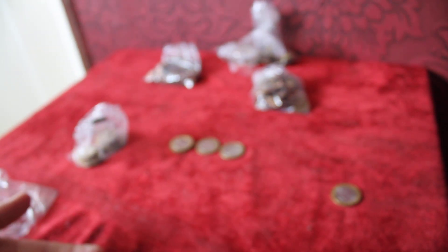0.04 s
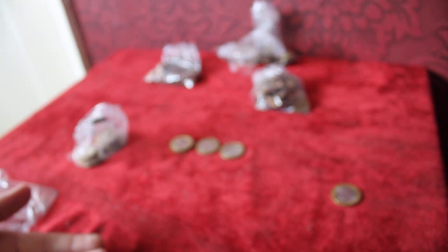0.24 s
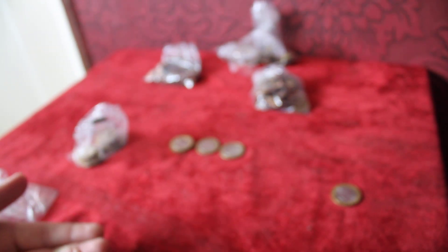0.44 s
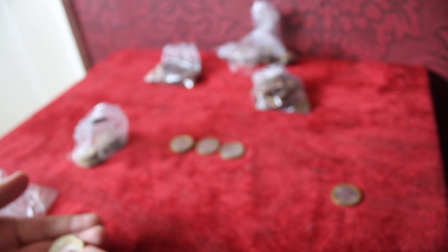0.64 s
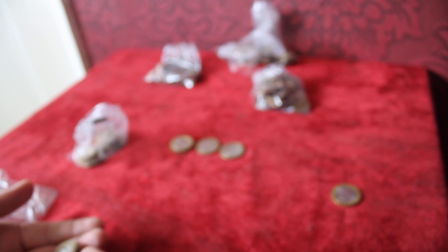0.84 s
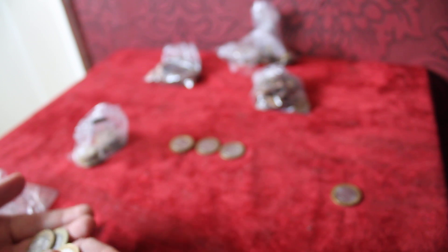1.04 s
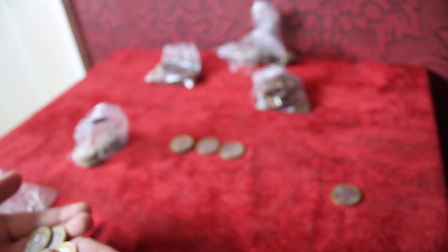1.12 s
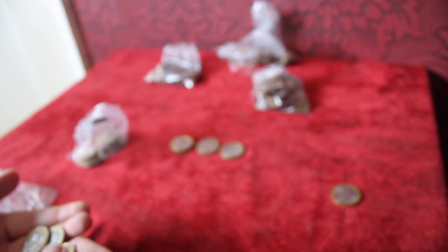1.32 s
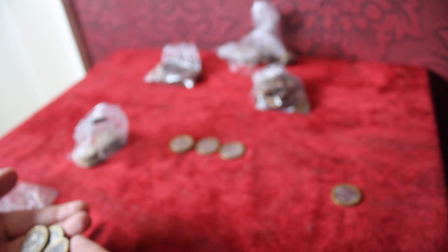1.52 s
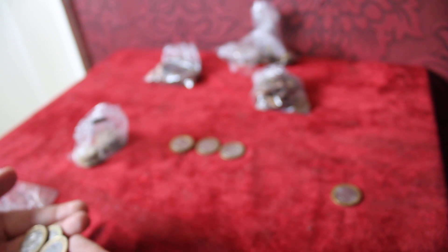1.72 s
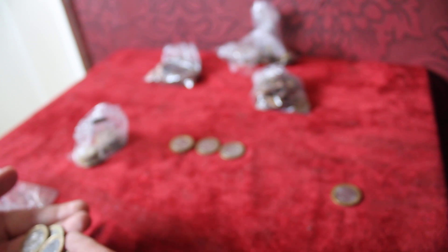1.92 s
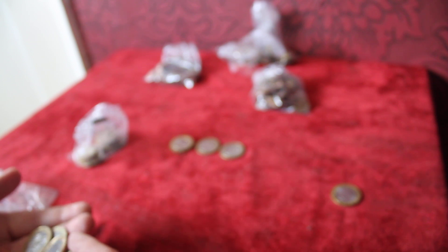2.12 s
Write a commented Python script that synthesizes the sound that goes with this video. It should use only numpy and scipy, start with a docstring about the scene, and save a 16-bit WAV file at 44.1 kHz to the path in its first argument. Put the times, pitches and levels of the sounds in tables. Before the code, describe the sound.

Coins clink into a palm, close up in a quiet room. A thin plastic bag crinkles and swishes from the start, and the first coins click and rasp together around 0.3 to 0.45 seconds. More crinkles and light clinks follow. The loudest clink lands at 0.9 seconds with a brief, high, shivering ring. Faint ticks and crinkles trail off by 1.6 seconds, leaving soft hiss and rustle.

```python
"""In a quiet room, close to the microphone, coins are tipped from a small plastic bag into a palm.
The coins click together and ring, and their ridged edges rasp past one another. One lands hard,
and they shiver briefly before the hand damps them; a few last ticks follow. The bag crinkles as
its creases snap, and swishes as it slips between the fingers. Faint hiss and rustle lie behind."""
import sys
import numpy as np
from scipy import signal
from scipy.fft import rfft, irfft, next_fast_len
from scipy.io import wavfile
from scipy.ndimage import map_coordinates

SR = 44100
rng = np.random.default_rng(int(sys.argv[2]) if len(sys.argv) > 2 else 0)


def transcribe(signal):
    """Save signal, clipped to [-1, 1], as a 16-bit WAV file at the path in sys.argv[1]."""
    frames = np.atleast_2d(signal).T
    limited = np.clip(frames, -1, 1)
    pcm = np.round(limited * 32767).astype(np.int16)
    wavfile.write(sys.argv[1], SR, pcm)


N = 94815

# Coin striking coin: start_s, click_db, ring_db, pitch_hz, fade_s (a fade is the time to drop 60 dB)
COIN_HITS = [(0.3264, -7.5, -28, 10100, 0.013), (0.3315, -11, -41, 10100, .02),
             (0.3403, -9.5, -38, 10100, .03), (0.3456, -4, -17.5, 10080, 0.018),
             (0.3757, -12.5, -32.5, 10430, 0.025), (.384, -5.5, -27, 10300, .03),
             (0.3874, -12.5, -16.5, 10070, 0.061), (.3914, -9.5, -25, 10340, .04),
             (.3977, -12, -20, 10380, .045), (.402, -10, -18, 10050, .045),
             (.4119, -17.5, -26.5, 10200, .05), (.4239, -15, -26.5, 10400, .05),
             (.431, -16, -23.5, 10450, 0.042), (0.563, -11.5, -29.5, 10400, 0.03),
             (.612, -24.5, -28.5, 10250, 0.06), (.6985, -28, -28.5, 10450, 0.11),
             (0.7711, -16.5, -21.5, 10310, 0.055), (.7875, -24, -24.5, 10340, 0.13),
             (.894, -6, -18, 10400, 0.035), (.8998, -8.5, -26, 10400, 0.033), (0.9045, -6, -26, 10250, .04),
             (.908, -9, -14, 8000, 0.024), (0.9088, 5, -8, 9000, 0.011), (0.9108, -6, -2, 10520, 0.01),
             (0.9181, -30, -22.5, 10270, 0.082), (0.9337, -24, -14.5, 10310, .06),
             (0.954, -30, -21.5, 10270, .08), (.9765, -23, -25, 10270, 0.074),
             (0.981, -20, -19, 10265, 0.092), (1.054, -23, -26.5, 10530, 0.04),
             (1.1796, -23, -36, 10400, 0.081), (1.1905, -21, -40, 10260, 0.12),
             (1.2386, -28.5, -36.5, 10570, 0.065), (1.3419, -22.5, -20, 10080, 0.029),
             (1.4181, -35, -35.5, 6900, 0.012)]
# The tones a coin rings with: pitch_ratio, level_db, fade_ratio
COIN_TONES = [(0.576, -23.5, .6), (.667, -19.5, .6), (.738, -20, 0.93), (.775, -19.5, .5), (1, 0.5, 1.18),
              (1.016, -11.5, .6), (1.05, -15.5, .3), (1.235, -22, .4)]
# Tone colour of a coin's click: frequency_hz, level_db
CLICK_COLOUR = [(300, -54.5), (1500, -26), (3500, -17), (5200, -6.5), (6800, -2.5), (8200, -5),
                (9600, -7.5), (11000, -7.5), (13000, -4.5), (16000, -9.5)]
# How hard the coins' edges slide on each other: time_s, level_db
SLIDE_LEVEL = [(.31, -96), (.335, -41), (.375, -29), (.402, -20), (.42, -29.5), (.431, -21), (.445, -55.5),
               (.51, -65.5), (.56, -31), (.585, -52), (.86, -53.5), (.884, -31), (.926, -43.5),
               (.965, -53.5), (.995, -35), (1.02, -43), (1.057, -33.5), (1.075, -51), (1.095, -45.5),
               (1.12, -67)]
# Tone colour of a ridged edge's tick: frequency_hz, level_db
RASP_COLOUR = [(300, -51), (900, -41.5), (1800, -19.5), (2900, -14.5), (3600, -23.5), (4200, -12.5),
               (5200, -6.5), (6000, 0), (6850, 4.5), (7400, -3), (8050, 0.5), (9500, -7), (11700, -4),
               (13500, -12), (16000, -16.5)]
# Creases snapping in the bag: start_s, level_db, fade_s, tilt_db_per_octave, peak_hz
BAG_SNAPS = [(.0055, -29.5, 0.013, -4, 7800), (0.0132, -16.5, 0.011, 0, 7800), (0.034, -36, .012, 0, 7800),
             (.107, -31, 0.0077, -1, 12300), (0.1435, -24, .02, -1, 7150),
             (0.1627, -16.5, .012, -2.5, 12500), (.181, -22.5, .014, 6, 7300),
             (.196, -24.5, .012, 9, 11500), (.2098, -21, .012, -6.5, 11900), (0.2124, -1.5, .012, 2, 11900),
             (0.224, -19, .016, 2, 12500), (0.234, -17, 0.019, -1, 9100), (.243, -14.5, 0.01, 1, 8200),
             (0.2758, -10.5, 0.013, -3, 11800), (0.3117, -19, .026, -5.5, 11240),
             (.3516, -12.5, 0.034, -3, 8800), (.3675, -15.5, .02, -6, 12400),
             (0.4994, -24, .035, -3.5, 3750), (0.5993, -19.5, 0.016, -2, 7150),
             (0.61, -6.5, .015, 2.5, 6950), (0.614, -7.5, .012, 1, 10300), (.658, -22.5, .026, -1, 3750),
             (0.6971, -6.5, .016, 1, 13350), (0.7485, -22.5, 0.019, 1, 6630),
             (.7648, -26.5, 0.034, -8, 7600), (.771, -17, 0.011, -1.5, 10300),
             (0.786, -4.5, 0.016, 2, 7970), (0.7963, -10, .028, -0.5, 7750), (.802, -10.5, .022, 0.5, 7660),
             (0.8508, -17, 0.028, -3.5, 13870), (0.8614, -9.5, .018, -3, 14000),
             (1.1793, -24, .018, 0, 10530), (1.1903, -27, .016, -2, 10550),
             (1.2143, -27.5, 0.017, -2.5, 11500), (1.239, -26.5, .018, -4, 11000),
             (1.329, -43, .016, -4.5, 4000), (1.3418, -23, .024, -4.5, 5000), (1.347, -35, .024, -7, 5000),
             (1.438, -34.5, 0.024, -6.5, 11970), (1.46, -38, .014, -3, 11400),
             (1.4901, -28, 0.024, -1, 11400), (1.4955, -22, 0.015, -0.5, 11370),
             (1.551, -25.5, 0.0196, 1, 4100)]
# Tone colour of the thin plastic: frequency_hz, level_db
PLASTIC_COLOUR = [(300, -49.5), (1000, -40), (1500, -25), (2100, -13.5), (3000, -16), (3900, -6),
                  (5600, -4.5), (7300, -0.5), (9300, -9), (10600, 2.5), (12700, 0.5), (14000, -8.5),
                  (16000, -17)]
# How hard the bag is crumpled: time_s, level_db
CRUMPLE_LEVEL = [(0, -59.5), (.11, -66), (.15, -45), (.2, -44.5), (.225, -31.5), (.295, -45.5),
                 (.325, -32.5), (.365, -28.5), (.4, -43.5), (.475, -50), (.52, -40.5), (.63, -47.5),
                 (.68, -69), (.72, -40), (.745, -49.5), (.8, -29), (.84, -74), (.875, -31.5), (.91, -41.5),
                 (.95, -72.5), (1.6, -81)]
# Plastic sliding over itself: time_s, level_db
SWISH_LEVEL = [(.11, -66), (.14, -44), (.205, -43.5), (.23, -60)]
# How long the room echoes: frequency_hz, fade_s
ROOM_FADE = [(300, .3), (3000, 0.22), (8000, 0.15), (15000, .2)]
# Tone colour of the steady hiss: frequency_hz, level_db
HISS_COLOUR = [(25, -15.5), (100, -9.5), (300, -10), (500, -11.5), (800, -12.5), (1800, -13), (5000, -14.5),
               (10400, -16.5), (15500, -22)]
# Tone colour of the low background rustle: frequency_hz, level_db
RUSTLE_COLOUR = [(30, -19), (120, -12), (200, -6.5), (290, 0.5), (420, -3.5), (650, -10), (850, -11),
                 (1100, -16), (2000, -13.5), (6000, -24.5), (15000, -40.5)]
# How that rustle comes and goes: time_s, level_db
RUSTLE_LEVEL = [(0, -58.5), (.19, -60), (.28, -72), (.46, -63.5), (.55, -54.5), (.85, -57), (.98, -70.5),
                (1.1, -62.5), (1.32, -60), (1.48, -61.5), (1.6, -72), (1.8, -67.5), (1.96, -60),
                (2.15, -58)]

CHATTER_PER_S, CHATTER_DB, CHATTER_CYCLES = 330, 3, .07  # touching coins shake a ring's level and phase
TONE_SCATTER, RING_RISE_S = .012, .000063  # coins differ a little in their side tones
RIDGES_PER_S, RIDGE_SCATTER, RUB_DB = 450, .18, -9  # rubbing level is relative to the ridge ticks
SLIDE_HZ, SLIDE_PITCH_SPREAD, SLIDE_RING_DB, SLIDE_FADE_S = 10410, .019, -18.5, .045
THUMP_S, THUMP_DB, THUMP_WIDTH_S = .9105, -21, .00008
SNAP_RISE_S, SNAP_HOLD_S, CREASES_PER_S, CREASE_FADE_S = .00031, .001, 600, .008
PEAK_DB, PEAK_OCTAVES = 13, .05  # height and half-width of the narrow peak in the bag's sounds
COIN_ROOM_DB, BAG_ROOM_DB, HISS_DB, TOP_HZ = -18, -12.5, -61, 15850


def coin_contact(click_db, ring_db, pitch_hz, fade_s, click_colour, click_fade_s):
    """One coin touches another: a sharp click sets it ringing, and its neighbours shake the ring."""
    t = np.arange(SR // 6) / SR
    ring = np.zeros(len(t))
    drift = CHATTER_CYCLES * wobble(t, CHATTER_PER_S)
    for ratio, db, fade_ratio in COIN_TONES:
        off_centre = min(abs(ratio - 1) * 10, 1)  # 0 for the main tone, so it stays in tune
        tone_hz = pitch_hz * ratio * (1 + TONE_SCATTER * rng.standard_normal() * off_centre)
        tone = np.sin(2 * np.pi * (tone_hz * t + drift + rng.random()))
        ring += amp(ring_db + db) * fade(t, fade_s * fade_ratio) * tone
    ring *= 1 - np.exp(-(t / RING_RISE_S) ** 2)
    chatter = amp(CHATTER_DB * wobble(t, CHATTER_PER_S))
    sound = unit(ring * chatter) * ring.std()
    click = burst(fade(t[:SR // 20], click_fade_s), colour(click_colour))
    add(sound, 0, amp(click_db) * click)
    return sound


def coin_clinks():
    """Coins strike each other; the palm cuts their ringing short."""
    track = np.zeros(N)
    for start_s, *hit in COIN_HITS:
        add(track, start_s, coin_contact(*hit, CLICK_COLOUR, click_fade_s=.0048))
    return track


def coin_sliding():
    """Ridged edges tick past each other and keep the coins ringing, while the flat faces rub."""
    pitches_hz = SLIDE_HZ * (1 + SLIDE_PITCH_SPREAD * np.linspace(-1, 1, 7))
    ticks = [coin_contact(0, SLIDE_RING_DB, hz, SLIDE_FADE_S, RASP_COLOUR, click_fade_s=.0045)
             for hz in pitches_hz]
    ridges = np.arange(int(RIDGES_PER_S * N / SR))
    times_s = (ridges + RIDGE_SCATTER * rng.standard_normal(len(ridges))) / RIDGES_PER_S
    rubbing = amp(RUB_DB) * noise(colour(RASP_COLOUR))
    return level(SLIDE_LEVEL) * (scatter(ticks, times_s, spread_db=1) + rubbing)


def bag_crinkle():
    """Single creases snap over a bed of tiny crackles, and the room echoes both."""
    t = np.arange(SR // 16) / SR
    near, into_room = np.zeros(N), np.zeros(N)
    for start_s, db, fade_s, tilt_db, peak_hz in BAG_SNAPS:
        rise = 1 - np.exp(-t / SNAP_RISE_S)
        envelope = amp(db) * rise * fade(np.maximum(t - SNAP_HOLD_S, 0), fade_s)
        # Each snap heard directly has a narrow peak of pitch; its echo has only the overall colour.
        add(near, start_s, burst(envelope, colour(PLASTIC_COLOUR, tilt_db, peak_hz)))
        add(into_room, start_s, burst(envelope, colour(PLASTIC_COLOUR, tilt_db)))
    creases = [burst(fade(t, CREASE_FADE_S), colour(PLASTIC_COLOUR, tilt_db=-4.5, peak_hz=hz))
               for hz in np.geomspace(3700, 12500, num=12)]
    times_s = rng.random(int(CREASES_PER_S * N / SR)) * N / SR
    crackle = level(CRUMPLE_LEVEL) * scatter(creases, times_s, spread_db=2)
    return near + crackle + amp(BAG_ROOM_DB) * room_echo(into_room + crackle)


def bag_swish():
    """Plastic slides over itself with a soft, bright swish."""
    return level(SWISH_LEVEL) * noise(colour(PLASTIC_COLOUR, tilt_db=2.5, peak_hz=12400))


def mic_overload_thump():
    """The loudest clink overloads the microphone with one short, dull thump."""
    t = np.arange(N) / SR
    return amp(THUMP_DB) * np.exp(-((t - THUMP_S) / THUMP_WIDTH_S) ** 2 / 2)


def room_echo(sound, delay_s=.005):
    """A furnished room answers with a short echo that lasts longest in the low notes."""
    hz, t, bands = signal.stft(rng.standard_normal(SR // 2), SR, nperseg=256)
    tail = signal.istft(bands * fade(t, along(ROOM_FADE, hz)[:, None]), SR, nperseg=256)[1]
    echo = np.pad(tail / np.linalg.norm(tail), (int(delay_s * SR), 0))
    return signal.fftconvolve(sound, echo)[:N]


def background():
    """A steady hiss and a soft low rustle that comes and goes."""
    hiss = noise(colour(HISS_COLOUR, size=8192), skip=SR)
    rustle = noise(colour(RUSTLE_COLOUR, size=8192), skip=SR)
    return amp(HISS_DB) * hiss + level(RUSTLE_LEVEL) * rustle


def amp(db):
    """Turn decibels into a gain."""
    return 10 ** (np.asarray(db) / 20)


def unit(sound):
    """Scale a sound to an average (rms) level of 1."""
    return sound / np.sqrt(np.mean(sound ** 2) + 1e-20)


def along(table, hz):
    """Read between a table's frequencies, with octaves evenly spaced."""
    table_hz, values = np.transpose(table)
    return np.interp(np.log(hz + 1), np.log(table_hz + 1), values)


def level(table):
    """Turn time_s, level_db rows into one gain per sample, near silent outside them."""
    times_s, db = np.transpose(table)
    return amp(np.interp(np.arange(N) / SR, times_s, db, left=-120, right=-120))


def fade(t, fade_s):
    """Die away by 60 dB every fade_s seconds."""
    return np.exp(-np.log(1000) * t / fade_s)


def wobble(t, per_s):
    """A smooth curve through per_s random values a second."""
    return map_coordinates(rng.standard_normal(1024), [t * per_s], mode='mirror')


def colour(table, tilt_db=0, peak_hz=None, size=1024):
    """A filter with the table's tone colour, tilt_db more per octave above 1 kHz and an optional peak."""
    hz = np.fft.rfftfreq(size, 1 / SR)
    db = along(table, hz) + tilt_db * np.log2(np.maximum(hz, 1000) / 1000)
    if peak_hz:
        db = db + PEAK_DB / (1 + (np.log2((hz + 1) / peak_hz) / PEAK_OCTAVES) ** 2)
    # Pack the filter's energy at its start (minimum phase), so clicks stay sharp.
    cepstrum = irfft(np.log(amp(db)))
    cepstrum[1:size // 2] *= 2
    cepstrum[size // 2 + 1:] = 0
    response = irfft(np.exp(rfft(cepstrum)))
    return response / np.linalg.norm(response)


def noise(response, skip=0):
    """Steady filtered noise; skip drops the first samples, where it builds up."""
    return unit(signal.fftconvolve(rng.standard_normal(N + skip), response)[skip:skip + N])


def burst(envelope, response):
    """A puff of filtered noise whose shape and energy follow the envelope."""
    puff = signal.fftconvolve(envelope * rng.standard_normal(len(envelope)), response)
    return puff * np.linalg.norm(envelope) / np.linalg.norm(puff) / 2


def scatter(sounds, times_s, spread_db):
    """At each time, play one of the sounds, picked at random and uneven in strength."""
    starts = np.clip(times_s * SR, 0, N - 1).astype(int)
    gains = amp(spread_db * np.clip(rng.standard_normal(len(starts)), -2, 2))
    picks = rng.integers(len(sounds), size=len(starts))
    track = np.zeros(N)
    for k, sound in enumerate(sounds):
        pulses = np.bincount(starts, gains * (picks == k), N)
        track += signal.fftconvolve(pulses, sound)[:N]
    return unit(track)


def add(track, start_s, sound):
    """Mix a sound into the track at start_s."""
    part = track[max(round(start_s * SR), 0):][:len(sound)]
    part += sound[:len(part)]


def scene():
    """Coins and bag close by, with the room behind them, in one channel."""
    coins = coin_clinks() + coin_sliding()
    echo = amp(COIN_ROOM_DB) * room_echo(coins)
    return (coins + echo + mic_overload_thump() + bag_crinkle() + bag_swish() + background())[None]


def record(dry):
    """Cut away all treble above TOP_HZ."""
    size = next_fast_len(N + SR // 2)
    kept = np.fft.rfftfreq(size, 1 / SR) < TOP_HZ
    return irfft(rfft(dry, size) * kept, size)[:, :N]


dry = scene()
out = record(dry)
transcribe(out)
```